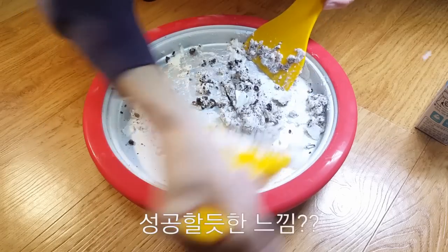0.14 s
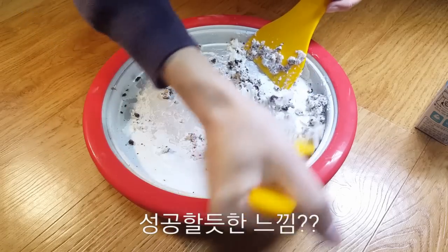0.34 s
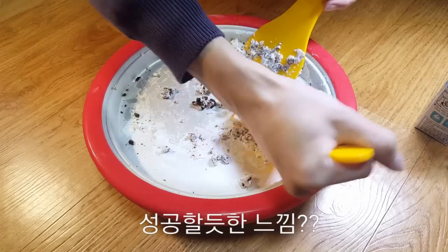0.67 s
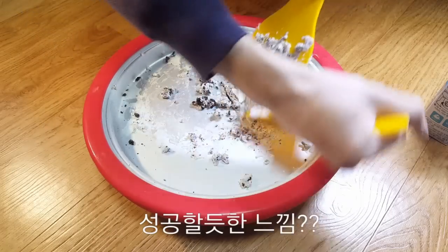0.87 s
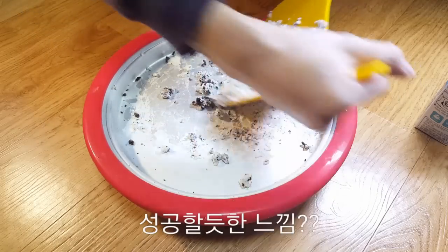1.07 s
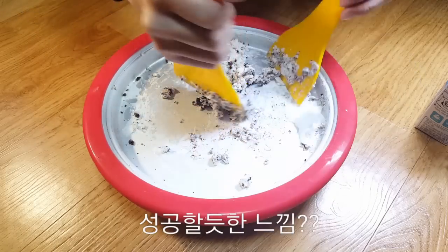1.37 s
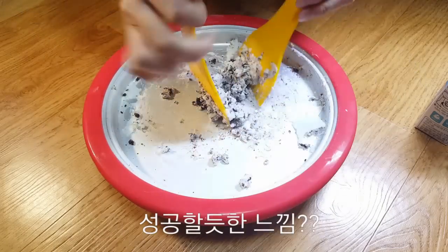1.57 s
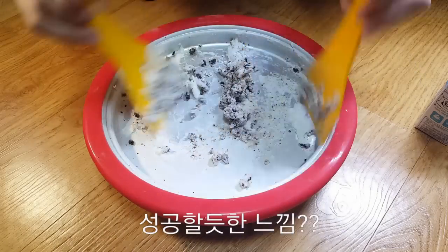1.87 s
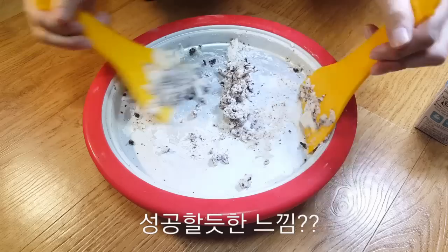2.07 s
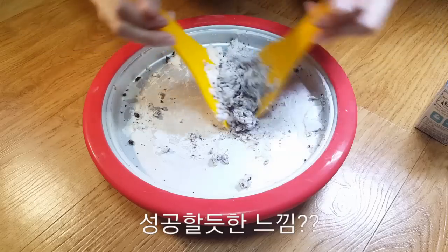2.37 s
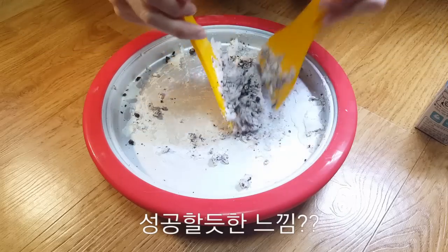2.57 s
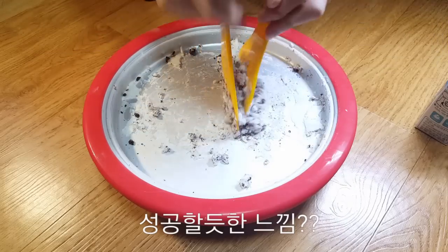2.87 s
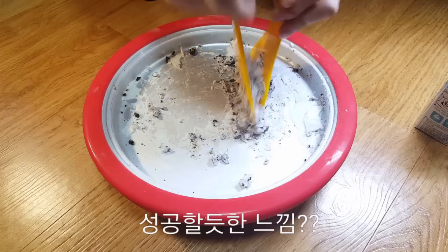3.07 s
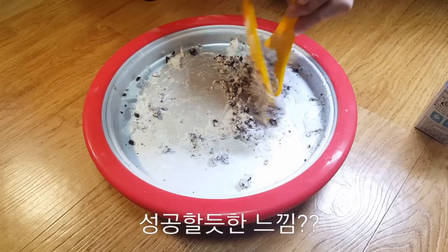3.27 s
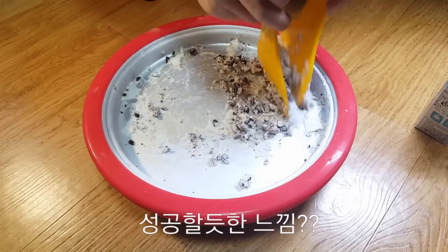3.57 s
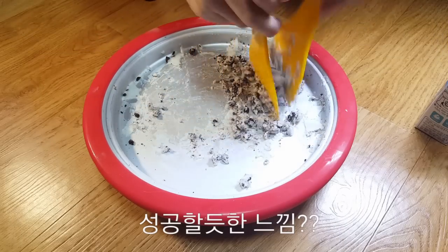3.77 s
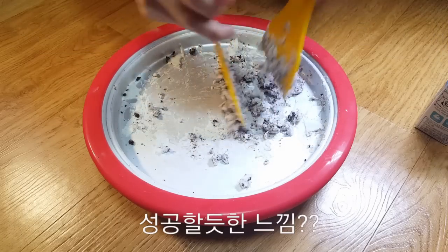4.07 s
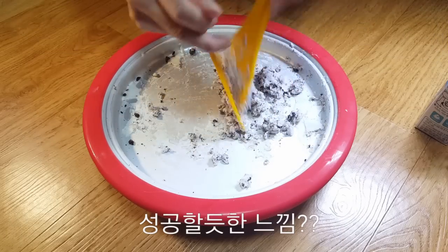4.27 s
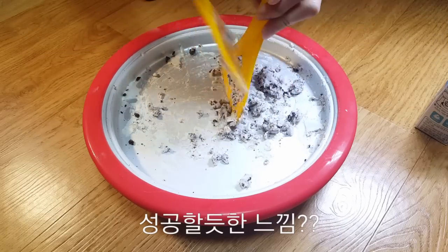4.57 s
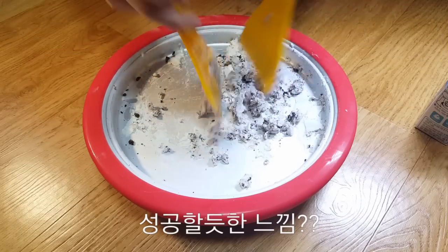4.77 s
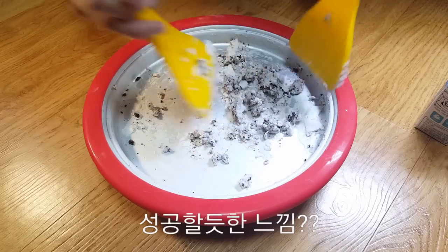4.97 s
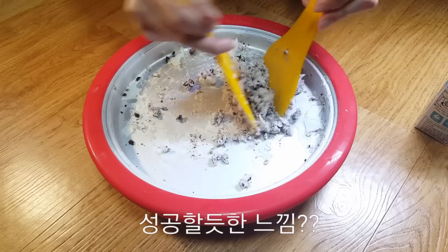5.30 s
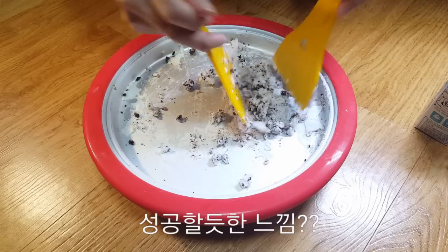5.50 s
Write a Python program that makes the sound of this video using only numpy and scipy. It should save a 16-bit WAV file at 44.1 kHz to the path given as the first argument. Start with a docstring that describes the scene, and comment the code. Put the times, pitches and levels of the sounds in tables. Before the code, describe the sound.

Close up in a small quiet room, two plastic spatulas work a half-frozen dessert on a metal pan. Short nasal scrapes and hard clicks come first, then duller sweeps and taps. A fast, uneven run of heavy chops follows with crunching ice crystals, before a few weaker taps and short scrapes. Faint pan ring and low thumps lie underneath.

```python
"""Two plastic spatulas work a half-frozen dessert on a cold metal plate that stands on the floor of a small room.
For 2.4 s blades scrape and tap: stick-slip grains give a nasal push, then a duller sweep as one is raised.
From 2.7 to 4 s they chop: damped knocks, blade clacks, thuds and shattering crystals over crushed-ice noise.
Sparser strokes, taps and weaker chops follow to 5.6 s.
Throughout, contacts excite pan modes and a low housing hum; echoes, a short tail and quiet air surround them."""
import sys
import numpy as np
from scipy import signal
from scipy.fft import rfft, irfft
from scipy.io import wavfile
from scipy.ndimage import uniform_filter1d, map_coordinates

SR = 44100
rng = np.random.default_rng(int(sys.argv[2]) if len(sys.argv) > 2 else 0)


def int16_out(signal):
    """Quantize to a 16-bit WAV file."""
    q = np.round(np.clip(np.atleast_2d(signal).T, -1, 1) * 32767)
    wavfile.write(sys.argv[1], SR, q.astype(np.int16))


N = 248724
TIME = np.arange(N) / SR
BLOW_SIZE = 4096  # samples
BLOW_TIME = TIME[:BLOW_SIZE]


def from_db(db):
    """Decibels to amplitude ratio."""
    return 10 ** (np.asarray(db) / 20)


def rms_one(x):
    """Scale to RMS 1 over all channels."""
    return x / np.sqrt(np.mean(x ** 2) + 1e-20)


def unit_energy(x):
    """Scale to energy 1, averaged over channels."""
    return x / np.sqrt(np.mean(np.sum(x ** 2, axis=-1)) + 1e-20)


def at_hz(points, hz):
    """Interpolate (frequency, value) points over log frequency."""
    f, value = np.transpose(points)
    return np.interp(np.log(np.maximum(hz, 1)), np.log(f), value)


def panned(x, balance_db):
    """Left minus right level is balance_db."""
    return x * from_db(np.array([[.5], [-.5]]) * balance_db)


def add(out, start_s, x):
    """Mix x into out from start_s, cut at the end."""
    i = round(start_s * SR)
    out[..., i:i + x.shape[-1]] += x[..., :N - i]


def band(x, hz, spread, order=2):
    """Band-pass from hz / spread to hz * spread."""
    sos = signal.butter(order, [hz / spread, hz * spread], "band", fs=SR, output="sos")
    return signal.sosfilt(sos, x + 1e-18)


def dulled(x, cut_hz):
    """Low-pass: the top of a sound is taken away."""
    return signal.sosfilt(signal.butter(2, cut_hz, fs=SR, output="sos"), x)


def resonate(x, modes):
    """Parallel resonances with alternating signs."""
    out = 0
    for k, (hz, width_hz, level_db) in enumerate(modes):
        r = np.exp(-np.pi * width_hz / SR)
        poles = [1, -2 * r * np.cos(2 * np.pi * hz / SR), r * r]
        gain = (-1) ** k * from_db(level_db) * (1 - r * r) / 2
        out = out + gain * signal.lfilter([1, 0, -1], poles, x + 1e-18)
    return out


def colour(x, spectrum):
    """Causal (minimum-phase) filter with the given spectrum, built by folding its cepstrum."""
    grid_hz = np.linspace(0, SR / 2, BLOW_SIZE // 2 + 1)
    cepstrum = irfft(np.log(from_db(at_hz(spectrum, grid_hz))))
    cepstrum[1:BLOW_SIZE // 2] *= 2
    cepstrum[BLOW_SIZE // 2 + 1:] = 0
    response = irfft(np.exp(rfft(cepstrum)))
    return signal.fftconvolve(x, response[None], axes=-1)[:, :x.shape[-1]]


def drift(per_s):
    """Smooth chance with RMS 1, per_s new values a second."""
    knots = np.arange(0, N / SR + 1, 1 / per_s)
    return rms_one(np.interp(TIME, knots, rng.standard_normal(len(knots))))


def grains(per_s, size_db, clump_db, clump_rate, scatter_db):
    """Stereo clicks of tiny fractures; they come in clumps, each from its own place along the edge."""
    chance, size, place = rng.random(N), rng.exponential(1, N), rng.standard_normal((2, N))
    size = from_db(size_db * np.minimum(size, 4)) * rng.choice([-1, 1], N)
    size = size * from_db(clump_db * drift(clump_rate))
    at = np.flatnonzero(chance < per_s / SR)
    balance_db = scatter_db * place[0, at]
    lag = np.round(4.2 * place[1, at]).astype(int)  # samples
    out = np.zeros((2, N))
    out[0, at] = size[at] * from_db(balance_db)
    out[1, np.clip(at + lag, 0, N - 1)] = size[at] * from_db(-balance_db)
    return out


def burst(decay_s):
    """A dying spurt of tiny slips, partly alike on both sides."""
    white = rng.standard_normal((3, BLOW_SIZE)) * np.exp(-BLOW_TIME / decay_s)
    return unit_energy(white[:2] + white[2])


# Air noise spectrum: hz, density_db_per_hz
AIR_COLOUR = [(20, -6.5), (54, -6), (72, 10), (88, -7), (250, -12), (2000, -17.5), (4000, -23),
              (12000, -28)]
AIR_DB = -67.0


def air():
    """Quiet room noise, shared in the bass, with separate hiss on each side."""
    white = rng.standard_normal((3, N))
    shared = band(white[2], 150, spread=1.4, order=1)
    separate = white[:2] - 0.12 * band(white[:2], 170, spread=6, order=1)
    return from_db(AIR_DB) * rms_one(colour(separate + shared, AIR_COLOUR))


# Nearby surfaces: delay_s, gain
ECHOES = [(.0113, 0.087), (.0131, 0.16), (.0142, -.15), (.0153, 0.049)]
ECHO_CUT_HZ = 1300
# Tail decay: hz, t60_s
ROOM_T60 = [(100, 0.43), (400, 0.23), (1000, 0.1843), (2800, 0.27), (8000, 0.28)]
# Tail level: hz, level_db
ROOM_LEVEL = [(100, -1.5), (300, -11.5), (750, -8), (1200, -6.5), (2000, -8.5), (8000, -6.5)]


def room(x):
    """A few close, dull echoes, then a short diffuse tail that is alike on both sides in the bass."""
    t = TIME[:SR // 2]
    response, white = np.zeros((2, len(t))), rng.standard_normal((2, 2, len(t)))
    build_up = 1 - np.exp(-(t / 0.008) ** 2)
    for k, hz in enumerate(np.geomspace(64, 16384, 17)):
        mid, side = band(white[k % 2], hz, spread=2 ** (1 / 4))
        alike = 1 / (1 + (hz / 550) ** 2)
        tail = np.sqrt(1 + alike) * mid + np.sqrt(1 - alike) * side * [[1], [-1]]
        tail = unit_energy(tail * build_up * from_db(-60 * t / at_hz(ROOM_T60, hz)))
        bandwidth_share = hz * np.log(2) / SR
        response += from_db(at_hz(ROOM_LEVEL, hz)) * np.sqrt(bandwidth_share) * tail
    echoes = np.zeros_like(response)
    for k, (delay_s, gain) in enumerate(ECHOES):
        # echoes come from alternate sides
        echoes[0, round(delay_s * SR)] += gain
        echoes[1, round((delay_s + .00015 * (-1) ** k) * SR)] += gain
    return signal.fftconvolve(x, response + dulled(echoes, ECHO_CUT_HZ), axes=-1)[:, :N]


def crush_force(contacts):
    """The downward push follows the strength of the contact noise, slightly compressed by the soft mix."""
    # origin=63: the mean looks back only
    strength = uniform_filter1d(np.abs(contacts.mean(0)), size=128, origin=63)
    return 0.71 * np.maximum(strength, 0) ** 0.98


# Housing jolted on the floor, and a low thump as the sound begins: start_s, level_db, pitch_hz
JOLTS = [(0.001, -22, 71.6), (0.175, -16.5, 118), (0.206, -13, 123), (0.261, -19, 73.4), (0.94, -32, 71.4),
         (4.027, -18, 72.6)]
# Housing resonances: hz, width_hz, level_db
HOUSING = [(71.5, 3.5, 1), (82.1, 12, -17), (140, 14, -7)]


def housing(contacts):
    """The base thumps when it is jolted and hums on after every jolt and contact."""
    thumps = np.zeros(N)
    for start_s, level_db, pitch_hz in JOLTS:
        thump = band(signal.unit_impulse(2 * BLOW_SIZE), pitch_hz, spread=1.106, order=1)
        add(thumps, start_s, from_db(level_db) * unit_energy(thump))
    drive = from_db(-9.5) * crush_force(contacts) + from_db(-1.0) * thumps
    return band(resonate(drive, HOUSING) + thumps, 103, spread=1.65, order=5)


# Pan modes: hz, level_db
PAN = [(315, -6), (386, -11.5), (452, -12), (522, -14), (593, -14), (661, -4.5), (884, -2.5)]
PAN_WIDTH_HZ = 14


def pan_ring(contacts):
    """The metal pan rings faintly: every mode takes up a little of each contact."""
    return sum(resonate(contacts.mean(0), [(hz, PAN_WIDTH_HZ, level_db)]) for hz, level_db in PAN)


# Blade position: time_s, left_lead_us
POSITION = [(0.6, 41.5), (2.3, -18.5), (2.7, 34.5), (3.35, 17.5), (3.55, -35.5), (3.8, -10), (4.1, 52.5)]
PLACED_BELOW_HZ = 6600  # higher up, the crystals sound from all along the edge


def off_centre(x):
    """The blades wander across the plate; the sound reaches the nearer side first."""
    lag = np.interp(TIME, *np.transpose(POSITION)) * 1e-6 * SR  # samples
    low = signal.sosfiltfilt(signal.butter(2, PLACED_BELOW_HZ, fs=SR, output="sos"), x[1])
    delayed = np.interp(np.arange(N) - lag, np.arange(N), low)
    return np.array([x[0], x[1] - low + delayed])


# Pushing blade raised from flat to upright: time_s, upright_share
UPRIGHT = [(1.1, 0.07), (1.5, 0.91)]


def share_upright():
    """How far the pushing blade is raised, over time."""
    return np.interp(TIME, *np.transpose(UPRIGHT))


# Nasal ring of a flat blade: hz, width_hz, level_db
FLAT_BLADE = [(2040, 72, -2)]


def blade_ring(contacts):
    """The flatter the blade lies, the more every contact sets it ringing."""
    return resonate(contacts * (1 - share_upright()), FLAT_BLADE)


# Blade drawn over the plate: start_s, length_s, rasp_db (edge), crunch_db (crystals),
# rumble_db (pushed heap), swell_db (start to end)
STROKES = [(0, 1.21, -69, -67.5, -80.5, -7), (0.171, 0.087, -46, -47.5, -55.5, -3),
           (0.398, 0.039, -45, -48, -61, 1.5), (0.485, 0.051, -44.5, -55, -88, 15),
           (0.55, 0.056, -41.5, -47.5, -60, -2.5), (0.743, 0.049, -61.5, -64.5, -70.5, 11),
           (0.858, 0.088, -41, -48.5, -53.5, 3.5), (1.322, 0.024, -51.5, -58, -60, -14),
           (1.514, 0.02, -47.5, -53.5, -57, 0), (1.666, 0.011, -63, -62, -65.5, 6.5),
           (1.929, 0.0022, -47, -53, -44, -6), (2.014, 0.19, -52, -54.5, -85, 6),
           (2.125, 0.045, -37, -45, -73, 4), (2.182, 0.058, -47.5, -55, -78, 5),
           (2.244, 0.115, -53, -55.5, -67, 6.5), (2.373, 0.03, -36.5, -43.5, -52, 3.5),
           (4.285, 0.097, -64.5, -59, -73.5, 7.5), (4.634, 0.013, -54, -50.5, -60.5, -13),
           (4.672, 0.024, -65, -52, -64, -3), (5.133, 0.049, -43.5, -46, -47.5, 6),
           (5.2, 0.047, -50.5, -54.5, -57.5, -4), (5.267, 0.074, -54, -56, -61, -18)]
BITE_S, LIFT_S = 0.0037, 0.0098  # time constants
SETTLE_DB, SETTLE_S = -21.5, 0.034  # crumbs, relative to the stroke; time constant
WAVER_DB, WAVER_PER_S = 1.8, 110  # hand pressure: RMS spread, changes per second


def stroke_gains():
    """Rasp, crunch, rumble gains: each stroke bites, swells or eases, lifts, and leaves crumbs settling."""
    power = np.zeros((3, N))
    for start_s, length_s, *levels_db, swell_db in STROKES:
        before_s = np.maximum(start_s - TIME, 0)
        after_s = np.maximum(TIME - start_s - length_s, 0)
        progress = np.clip((TIME - start_s) / length_s, 0, 1)
        settling = from_db(SETTLE_DB) * np.exp(-after_s / SETTLE_S)
        release = np.maximum(np.exp(-after_s / LIFT_S), settling)
        pressure = np.exp(-before_s / BITE_S) * from_db(swell_db * (progress - .5)) * release
        power += np.outer(from_db(levels_db), pressure) ** 2
    return np.sqrt(power) * from_db(WAVER_DB * drift(WAVER_PER_S))


def heap_rumble():
    """Lumps tumbling ahead of the blade drum softly on the plate."""
    lumps = grains(per_s=900, size_db=2, clump_db=1, clump_rate=60, scatter_db=2).sum(0)
    return rms_one(band(lumps, 350, spread=1.57) + from_db(-3.5) * band(lumps, 155, spread=1.2))


FLEX_SHARE, FLEX_PER_S = .045, 22  # RMS pitch spread, changes per second


def flexed(x):
    """The blade bends under the hand, so its resonances slide up and down."""
    position = np.cumsum(1 + FLEX_SHARE * drift(FLEX_PER_S)) % N
    return np.array([map_coordinates(side, [position]) for side in x])


# Blade spectra, flat and upright: hz, density_db_per_hz
PUSH_COLOUR = [(80, -10), (480, -8.5), (850, -4), (1350, 2.5), (1850, 2.5), (2300, -2), (3050, -4),
               (3700, -18.5), (6000, -30.5)]
SWEEP_COLOUR = [(80, -19), (200, -13), (340, -16.5), (550, -4), (760, 4.5), (1050, -4.5), (1350, -3),
                (2000, -9), (3200, -18), (6000, -45.5)]
# Crystal spectrum: hz, density_db_per_hz
ICE_COLOUR = [(1500, -11), (3000, 4), (5500, 1), (7200, 2), (8500, 5), (9900, -8), (11500, -5),
              (14500, -7.5), (16000, -30)]


def scraping():
    """Edges stick and slip: nasal lying flat, duller upright; crystals fracture finely under them."""
    rasp, crunch, rumble = stroke_gains()
    upright = share_upright()
    # coarse crumbs jerk the blade and crack at once
    catches = rms_one(grains(per_s=220, size_db=1.7, clump_db=1, clump_rate=60, scatter_db=2))
    slips = rms_one(grains(per_s=2000, size_db=2.5, clump_db=2.5, clump_rate=210, scatter_db=2.5))
    fractures = rms_one(grains(per_s=5930, size_db=-1.5, clump_db=-3.0, clump_rate=190, scatter_db=0.0))
    drag = slips + .3 * catches
    push = rms_one(flexed(colour(drag, PUSH_COLOUR)))
    sweep = rms_one(flexed(colour(drag, SWEEP_COLOUR)))
    ice = rms_one(colour(fractures + .5 * catches, ICE_COLOUR))
    edge = np.sqrt(1 - upright) * panned(push, 2.9) + np.sqrt(upright) * panned(sweep, 0.75)
    return rumble * heap_rumble() + rasp * edge + crunch * panned(ice, -0.41)


def crushing(rise_s, fall_s):
    """A descending blade crushes crumbs ever harder until it lands; the heap then settles."""
    force = np.zeros(N)
    for start_s, *_, crush_db in CHOPS:
        swell = np.where(TIME < start_s, (TIME - start_s) / rise_s, (start_s - TIME) / fall_s)
        force += from_db(crush_db) * np.exp(swell)
    ice = grains(per_s=5900, size_db=0.5, clump_db=0.5, clump_rate=49, scatter_db=8.5)
    paste = grains(per_s=1100, size_db=7.0, clump_db=-2.0, clump_rate=83, scatter_db=6.5)
    ice, paste = rms_one(colour(ice, ICE_COLOUR)), rms_one(colour(paste, SWEEP_COLOUR))
    return force * (ice + from_db(6.5) * paste)


def crack(decay_s):
    """A few milliseconds of crystals shattering under an edge."""
    return unit_energy(colour(burst(decay_s), ICE_COLOUR))


# Plastic blade click spectrum: pitch_multiple, density_db_per_hz
BLADE = [(.08, -14.5), (.16, -6), (.45, -3), (.65, 4), (1.299, 3), (1.601, 0), (1.9, -9), (5, -36.5)]


def blade_click(hz, skid):
    """Short, woody click around hz; the skid share of its force's energy is a gritty burst."""
    force = np.sqrt(1 - skid) * signal.unit_impulse(BLOW_SIZE) + np.sqrt(skid) * burst(decay_s=.004)
    return unit_energy(colour(force, [(ratio * hz, db) for ratio, db in BLADE]))


# Bare edge taps or catches: start_s, level_db, pitch_hz, skid_share, crack_db, left_right_db
TAPS = [(0.0664, -28, 1350, 0.6, -23, -1), (0.1105, -3, 1850, 1, -20, 0),
        (0.1575, -9.5, 1630, 0.74, -20, 6), (0.1752, -10, 900, 1, -13.5, -6.5),
        (0.2095, -12.5, 760, 1, -23, -4), (0.4113, -9, 2060, 1, -26, -1.5),
        (0.5639, -17.5, 1400, 0.8, -37, 4), (0.6325, 0.5, 1900, 0.46, -11, 2),
        (0.8376, -9.5, 1980, 0.25, -51, 3.5), (0.878, -11.5, 1950, 1, -19, 4),
        (1.234, -27.5, 1310, 0.3, -51, 2), (1.3099, -18.5, 1900, 0.98, -22.5, 3),
        (1.3292, -26, 840, 0.6, -35, -4), (1.4683, -20, 1360, 0.77, -28.5, 5),
        (1.925, -18, 820, 0.99, -39, 1), (1.9534, -19.5, 1610, 0.6, -18.5, 1),
        (2.113, -18, 790, 0.4, -38, 1), (2.2133, -16.5, 844, 0.84, -42, -3),
        (2.3127, -15, 1150, 0.85, -24, 6), (2.3455, -18.5, 1120, 0.57, -28, 3),
        (2.3732, -8, 860, 0.5, -42, -1), (4.478, -38, 1600, .6, -48, 2), (4.6284, -13, 1404, 0.75, -29, 1),
        (5.1714, -18, 900, 0.75, -17, 2), (5.2205, -20, 685, 1, -35, -9)]


def taps():
    """A hard contact: the blade clicks cleanly or skids, and ice cracks."""
    out = np.zeros((2, N))
    for start_s, level_db, pitch_hz, skid_share, crack_db, balance_db in TAPS:
        click = from_db(level_db) * blade_click(pitch_hz, skid_share)
        ice = from_db(crack_db) * crack(decay_s=0.0029)
        add(out, start_s, panned(click + ice, balance_db))
    return out


# Cushioned knock spectrum: pitch_multiple, density_db_per_hz
KNOCK = [(.22, -34), (.45, -14.5), (.7, -2), (1, 3), (1.45, -3), (2, -11.5), (4, -51.5)]
# Chops through the mix onto the plate: start_s, knock_db, knock_hz, clack_db, clack_hz (blade),
# crack_db (ice), thud_db, crush_db (crushed ice)
CHOPS = [(1.507, -8.5, 400, -25, 1050, -48, -18, -65), (2.6675, 1.5, 676, -15, 1630, -24.5, -26, -74),
         (2.8364, -8, 740, -25.5, 1390, -26, -24, -48.5), (2.922, 9, 730, -8.5, 2020, -23, -23, -47.5),
         (3.0995, -10, 640, -30, 1080, -31, -15.5, -44),
         (3.1396, -7.5, 660, -19.5, 1990, -23.5, -15.5, -52.5),
         (3.2993, 1.5, 743, -14.5, 1440, -26.5, -12.5, -45), (3.376, 12, 717, -1.5, 1540, -15, -15, -44.5),
         (3.513, -3, 500, -5.5, 1520, -27, -16, -50), (3.5878, 5.5, 607, -6.5, 1640, -20.5, -12.5, -48),
         (3.707, 5, 736, -5.5, 2080, -34, -17, -50.5), (3.7907, 11.5, 756, 4, 1166, -13, -10.5, -45),
         (3.9339, -18, 580, -8.5, 1270, -20, -13.5, -46.5), (3.9933, 3, 475, -17, 900, -40, -11, -50.5),
         (4.379, -15.5, 620, -30.5, 1404, -37.5, -35.5, -61),
         (4.6829, -7.5, 677, -17.5, 1430, -16.5, -30, -52), (5.1376, -12, 530, -32, 1304, -41, -22, -74),
         (5.613, -30.5, 336, -40.5, 1500, -45.5, -28, -62)]


def chops():
    """The mix cushions each blow to a short, heavily damped knock; blade, ice and base answer with it."""
    out, click = np.zeros((2, N)), signal.unit_impulse(BLOW_SIZE)
    for start_s, knock_db, knock_hz, clack_db, clack_hz, crack_db, thud_db, _ in CHOPS:
        # a weak blow stutters through the crumbs, a strong one lands cleanly
        stutter = 0.15 * from_db(-.9 * max(knock_db, -7)) * rng.standard_normal(BLOW_SIZE)
        force = click + stutter * np.exp(-BLOW_TIME / 0.003)
        knock = unit_energy(colour(force[None], [(ratio * knock_hz, db) for ratio, db in KNOCK]))
        clack = unit_energy(band(blade_click(clack_hz, skid=0.13), clack_hz, spread=1.7, order=1))
        low_thud = unit_energy(band(click, 125, spread=1.45))
        high_thud = unit_energy(band(click, 315.5, spread=1.3))
        thud = from_db(-4.0) * low_thud - from_db(6.0) * high_thud
        # one sharp snap with a longer, duller spray of fractures
        ice = crack(decay_s=0.0012) + from_db(2.0) * dulled(crack(decay_s=0.0037), cut_hz=5400)
        # knock and thud lead by 0.4 ms
        add(out, start_s - .0004, panned(from_db(knock_db) * knock, 1.2) + from_db(thud_db) * thud)
        add(out, start_s, panned(from_db(clack_db) * clack, 6.0) + from_db(crack_db) * ice)
    return out


def scene():
    """All contacts, and what they set ringing, in the room."""
    contacts = chops() + taps() + scraping() + crushing(rise_s=0.0086, fall_s=0.012)
    contacts = contacts + blade_ring(contacts)
    return off_centre(contacts) + pan_ring(contacts) + room(contacts) + housing(contacts) + air()


CUTOFF_HZ = 14700


def record(dry):
    """The very hardest peaks are rounded; the top is cut steeply."""
    rounded = dry / (1 + (dry / .95) ** 8) ** (1 / 8)
    return signal.sosfilt(signal.ellip(10, .3, 70, CUTOFF_HZ, fs=SR, output="sos"), rounded)


dry = scene()
out = record(dry)
int16_out(out)
```